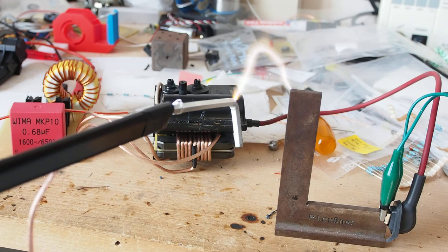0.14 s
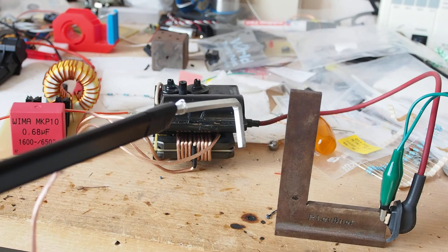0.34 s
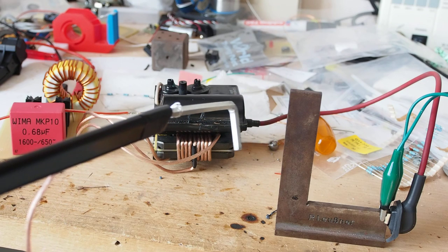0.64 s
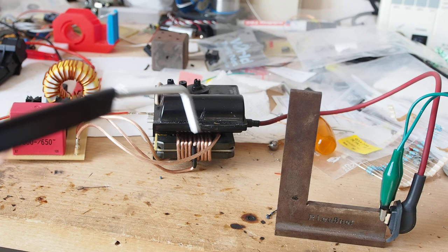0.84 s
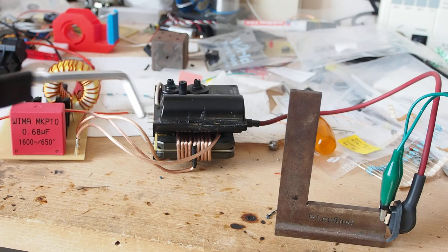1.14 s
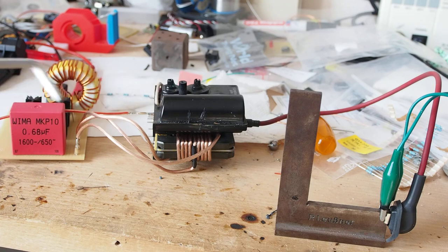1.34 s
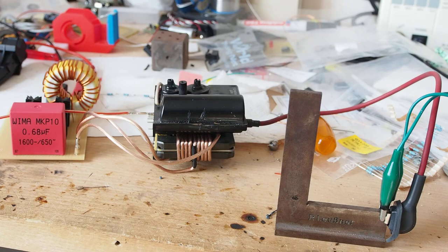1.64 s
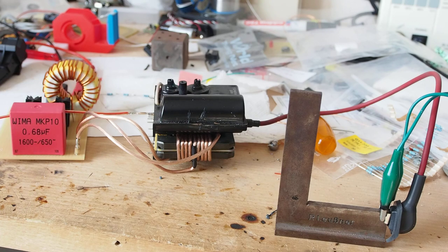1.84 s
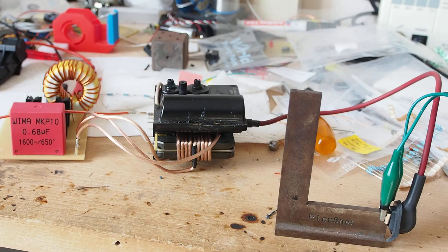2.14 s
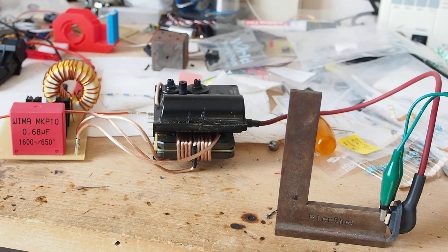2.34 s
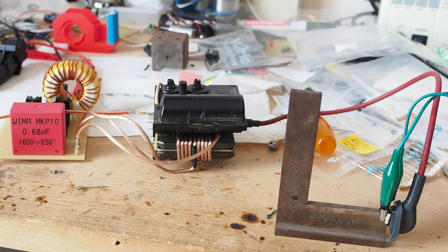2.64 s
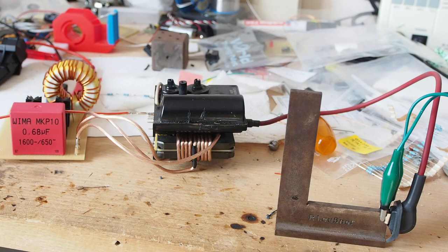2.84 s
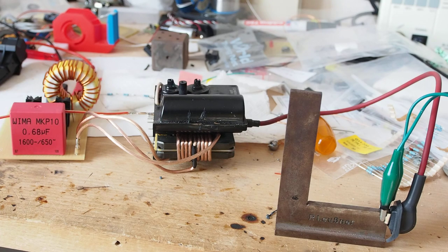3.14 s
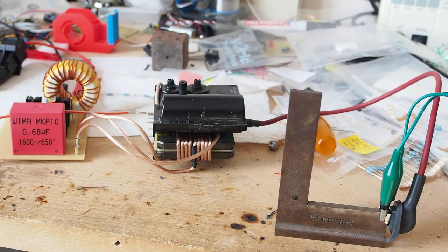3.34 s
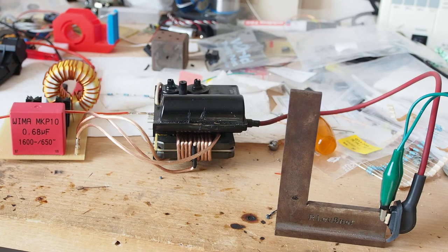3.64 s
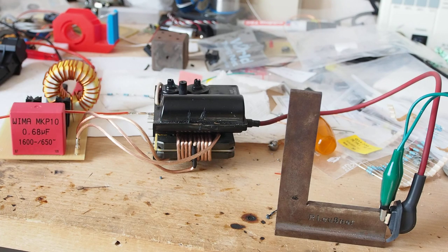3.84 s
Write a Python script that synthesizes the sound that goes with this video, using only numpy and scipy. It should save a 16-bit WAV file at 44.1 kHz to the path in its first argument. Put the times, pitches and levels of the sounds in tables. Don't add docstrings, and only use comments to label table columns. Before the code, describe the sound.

Electric arcs snap in a fast, bright cluster at the very start, their echo fading in a hard room; then a cooling fan's airy roar swells back and holds, with faint cloth rustle and tiny ticks.

```python
import sys
import numpy as np
from scipy import signal
from scipy.fft import rfft, irfft, next_fast_len
from scipy.io import wavfile
from scipy.ndimage import uniform_filter1d, map_coordinates

SR = 44100
rng = np.random.default_rng(int(sys.argv[2]) if len(sys.argv) > 2 else 0)


def put_to_file(sound):
    columns = np.atleast_2d(sound).T
    safe = np.clip(columns, -1, 1)
    whole_steps = np.round(safe * 32767)
    wavfile.write(sys.argv[1], SR, whole_steps.astype(np.int16))


def volts_from_decibels(level):
    exponent = np.asarray(level, float) / 20
    return 10 ** exponent


N = 176400

# (time_s, low_gain_db, high_gain_db)
CAMERA_GAIN = [
    (0, -20, -5),
    (.17, -23, -5),
    (.28, -14, -6.5),
    (.33, -6.5, -5),
    (.4, 0.5, -3.5),
    (.47, 3.5, -1),
    (1.1, 4.5, 1),
    (4, 5, 1.5),
]
LEFT_LEAD_S = 8e-5


def unit(x):
    return x / np.sqrt(np.mean(x ** 2) + 1e-20)


def along(points, hz):
    f, v = np.transpose(points)
    return np.interp(np.log(hz + 1), np.log(f + 1), v)


def curves(rows):
    s, *cols = np.transpose(rows)
    return [np.interp(np.arange(N) / SR, s, c) for c in cols]


def wobble(rate):
    knots = rng.standard_normal(int(N * 40 / SR) + 4)
    return map_coordinates(knots, [np.arange(N) * rate / SR])


def filtered(x, response):
    n = x.shape[-1]
    m = next_fast_len(n + 8192)
    return irfft(rfft(x, m) * response(np.fft.rfftfreq(m, 1 / SR)), m)[..., :n]


def peak(f, hz, width):
    return 1j * f * width / (hz * hz - f * f + 1j * f * width)


def lead(x, s):
    return filtered(x, lambda f: np.exp(1j * np.pi * f * s * np.array([[1], [-1]])))


def rush(gain, patchy_db):
    # (pitch_hz, likeness 0 to 1)
    likeness = [(30, 0.38), (60, 0.43), (130, 0.94), (290, 0.92), (640, 0.92), (1410, 0.78), (3100, 0.38),
                (6800, 0.17), (15000, 0.067)]
    z = signal.stft(rng.standard_normal((2, N)), nperseg=512)[2]
    patches = uniform_filter1d(rng.standard_normal(z.shape[1:]), size=5, axis=0)
    patches = uniform_filter1d(patches, size=8, axis=1)
    pair = signal.istft(z * volts_from_decibels(patchy_db * unit(patches)), nperseg=512)[1][:, :N]

    def middle_and_side(f):
        turn = np.arccos(np.clip(along(likeness, f), -1, 1)) / 2
        return gain(f) * np.array([np.cos(turn), np.sin(turn)])

    mid, side = filtered(pair, middle_and_side)
    return unit(lead(np.array([mid + side, mid - side]), LEFT_LEAD_S))


def shock(f):
    # (pitch_hz, width_hz, level_db)
    openings = [(4480, 5900, 5), (8300, 1200, -0.5)]
    shock_hz, shock_width_hz, top_hz, thump_hz, thump_db = 6010, 11500, 9670, 550, 0.5
    ports = sum(volts_from_decibels(db) * peak(f, hz, w) for hz, w, db in openings)
    ports = ports - volts_from_decibels(3) * peak(f, 2000, 900)
    soft = peak(f, top_hz, top_hz) * top_hz / (1j * f + 1)
    snap = ports * soft ** 2 * peak(f, shock_hz, shock_width_hz) ** 2
    thump = volts_from_decibels(thump_db) * peak(f, thump_hz, 2 * thump_hz) ** 2
    return snap + thump


def restrikes(spark):
    db, rate_hz, ms, fade_db, drop_db = spark
    scatter_db, jitter = 1.2, .04
    count = np.arange(16)
    at = (count + jitter * rng.standard_normal(16)) / rate_hz * (count > 0)
    later_db = np.where(at > 0, scatter_db * rng.standard_normal(16) - drop_db, 0)
    size_db = db - fade_db * at * 1000 + later_db
    share = np.clip((ms / 1000 - at) * rate_hz + 1, 0, 1)
    return at, share * volts_from_decibels(size_db)


def room_fall():
    # (pitch_hz, fade_s)
    fade_times = [(500, 0.47), (3000, 0.78), (7000, 0.58), (13000, 0.28)]
    # (pitch_hz, level_db)
    tint = [(300, -17.5), (1200, -7), (2200, -1.5), (4300, 4), (7000, 2), (9000, 6.5), (11000, 1),
            (13300, 10), (14100, -30)]
    early_db, early_fade_s, late_db, rise_s = -12, 0.025, -9, 0.0014
    hz, t, _ = signal.stft(np.zeros(SR * 3 // 4), SR, nperseg=128)
    late = volts_from_decibels(late_db - 60 * t / along(fade_times, hz)[:, None]) / 100
    early = volts_from_decibels(early_db - 60 * t / early_fade_s) / 20
    return (late + early) * volts_from_decibels(along(tint, hz))[:, None] * (1 - np.exp(-t / rise_s))


def room_tail(fall):
    z = signal.stft(rng.standard_normal((2, SR * 3 // 4)), nperseg=128)[2]
    return signal.istft(z * fall, nperseg=128)[1]


def sparks():
    # (peak_db, strike_rate_hz, length_ms, fade_db_per_ms, drop_after_first_db)
    discharges = [(1, 4400, .6, 6, 1), (-1, 3050, .7, 5, 10), (-10, 3000, .4, 9, 8), (-23, 3600, .9, 2, 0),
                  (-2, 4600, .95, 5, 3), (-8, 4200, .55, 1, 0), (-2, 4450, .45, 10, 0),
                  (-21, 4400, .6, 2, 0), (-2, 6850, 1.65, 1.2, 8), (-7, 4500, .35, 1, 0),
                  (-8, 7100, .7, 3, 5)]
    starts = [-.03, .03589, .0391, .0447, .05035, .0539, .11049, .1138, .15864, .1616, .16363]
    echo_levels = [4, -2, -1.5, 2, 6.5, -8, 2, -2, 8, -5, 10.5]
    spark_db, right_lead_s = 13.5, 1.4e-5
    blur = .75
    swallow_s, swallow_db_per_s = 0.39, 129
    ahead, size = SR // 10, 2048
    f = np.fft.rfftfreq(size, 1 / SR)
    direct = np.zeros(N + ahead)
    wet = np.zeros((2, N + ahead))
    fall = room_fall()
    for s, send_db, spark in zip(starts, echo_levels, discharges):
        at, strengths = restrikes(spark)
        part, i = np.modf(s * SR + ahead)
        i = int(i)
        train = strengths @ np.exp(-2j * np.pi * np.outer(at + part / SR, f))
        blow = volts_from_decibels(spark_db) * irfft(train * shock(f), size)[:size // 2]
        direct[i:][:len(blow)] += blow

        blurred = np.sqrt((1 - blur) * abs(train) ** 2 + blur * np.sum(strengths ** 2))
        to_walls = np.roll(irfft(blurred * shock(f), size), size // 16)[None, :size // 2]
        echo = signal.fftconvolve(volts_from_decibels(spark_db + send_db) * to_walls, room_tail(fall), axes=1)
        wet[:, i:i + echo.shape[1]] += echo
    time_s = (np.arange(N + ahead) - ahead) / SR
    wet *= volts_from_decibels(-swallow_db_per_s * np.clip(time_s - swallow_s, 0, None))
    near = lead(np.array([direct, direct]), -right_lead_s)
    return (near + wet * volts_from_decibels([[-.5], [.5]]))[:, ahead:]


def sleeve():
    # (time_s, level_db)
    rubbing = [
        (.5, -92),
        (1.1, -73),
        (1.42, -61),
        (1.7, -65),
        (2.3, -70),
        (2.6, -63.5),
        (2.8, -62),
        (3, -73),
        (4, -83),
    ]
    # (pitch_hz, level_db)
    cloth = [(3000, -26), (5000, -6), (7500, -1), (9200, 0), (10300, -14), (13000, -30), (15800, -60)]
    # (start_s, peak_db)
    ticks = [
        (1.602, -37),
        (1.609, -39),
        (2.9907, -51),
        (3.1812, -41),
        (3.2616, -44),
        (3.4541, -39),
        (3.6606, -50),
        (3.7589, -45),
        (3.8682, -42),
    ]
    tick_fade_s, tick_db = 0.015, -12.5
    level = volts_from_decibels(curves(rubbing)[0] + 1.2 * wobble(30))
    t = np.arange(SR // 20) / SR
    for s, db in ticks:
        level[round(s * SR):][:len(t)] += volts_from_decibels(db + tick_db - 60 * t / tick_fade_s)
    return level * rush(lambda f: volts_from_decibels(along(cloth, f)), patchy_db=2.5)


def fan_tones():
    # (pitch_hz, level_db, wander_hz)
    hum = [(123.7, -69, 0.45), (232.2, -51, 0.48)]
    tones = np.zeros(N)
    for hz, db, wander_hz in hum:
        level = volts_from_decibels(db + 1.5 + 1.3 * wobble(4.8))
        tones += level * np.sin(2 * np.pi * np.cumsum(hz + wander_hz * wobble(8)) / SR)
    return lead(np.array([tones, tones]), LEFT_LEAD_S)


def fan():
    # (pitch_hz, level_db_per_hz)
    rumble = [(20, -77.5), (60, -33), (110, -10.5), (150, -7.5), (190, -0.5), (480, 3), (640, -35.5),
              (1200, -120)]
    # (pitch_hz, level_db_per_hz)
    roar = [(330, -21), (560, 4.5), (800, -1.5), (1300, 0.5), (2000, -3), (2900, -9.5), (3800, -40.5),
            (6000, -120)]
    # (pitch_hz, level_db_per_hz)
    hiss = [(1900, -22), (3100, -1), (5000, -7), (6400, -11.5), (9000, -14.5), (11000, -20), (15600, -25),
            (15900, -72)]
    # (pitch_hz, width_hz, level_db)
    housing = [(192.8, 16, -57), (333.9, 12, -65), (381, 29.3, -53.5), (1282, 170, -58.5), (4950, 200, -72),
               (11612, 70, -81)]
    rumble_db, roar_db, hiss_db = -49, -46.5, -56
    flow_db = .4 * wobble(2) + .6 * wobble(12)
    held_db = np.minimum(curves(CAMERA_GAIN)[0], 0)
    air = volts_from_decibels(rumble_db + flow_db) * rush(lambda f: volts_from_decibels(along(rumble, f)), patchy_db=1.1)
    air += volts_from_decibels(roar_db + flow_db) * rush(lambda f: volts_from_decibels(along(roar, f)), patchy_db=0.62)
    air += volts_from_decibels(hiss_db + held_db) * rush(lambda f: volts_from_decibels(along(hiss, f)), patchy_db=0.1)
    for hz, width, db in housing:
        air += volts_from_decibels(db) * rush(lambda f: peak(f, hz, width) ** 2, patchy_db=-1.2)
    return (air + fan_tones()) * volts_from_decibels([[.3], [-.3]])


def scene():
    return sparks() + sleeve() + fan()


def roll_off(x):
    return signal.sosfilt(signal.butter(12, 16500, fs=SR, output="sos"), x)


def record(dry):
    split_hz, top_hz, top_slope_hz = 1600, 16900, 1100
    low_db, high_db = curves(CAMERA_GAIN)
    low = filtered(dry, lambda f: 1 / (1 + (f / split_hz) ** 4))
    mix = low * volts_from_decibels(low_db) + (dry - low) * volts_from_decibels(high_db)
    mix = np.clip(mix, -1, 1)
    mix = filtered(mix, lambda f: np.sin(np.pi / 2 * np.clip((top_hz - f) / top_slope_hz, 0, 1)) ** 2)
    return roll_off(mix)


dry = scene()
out = record(dry)
put_to_file(out)
```